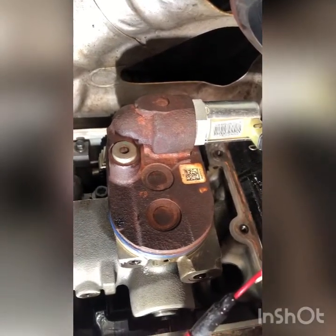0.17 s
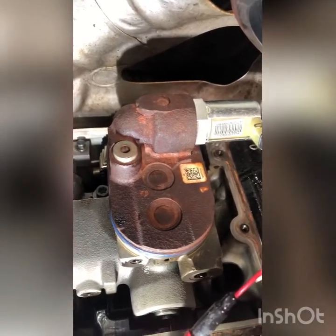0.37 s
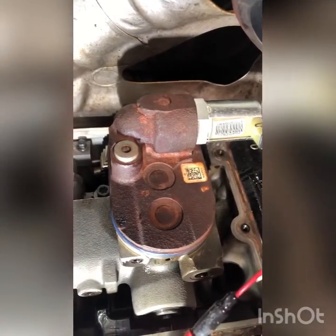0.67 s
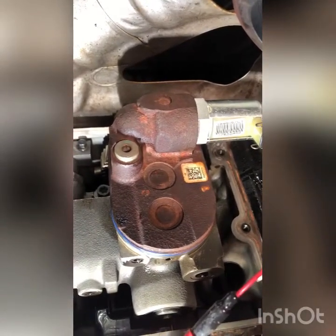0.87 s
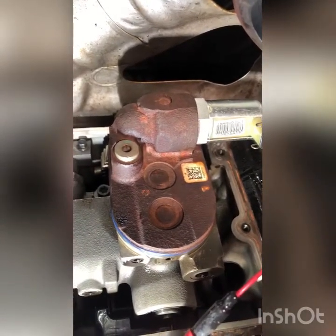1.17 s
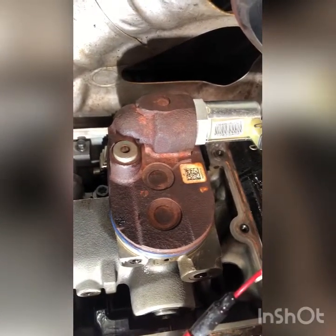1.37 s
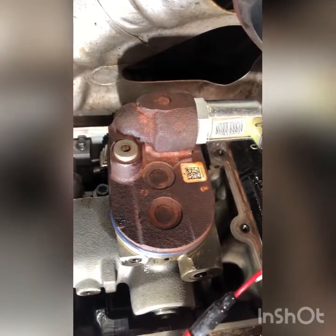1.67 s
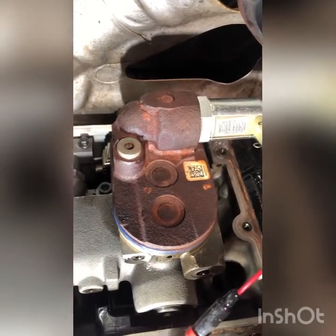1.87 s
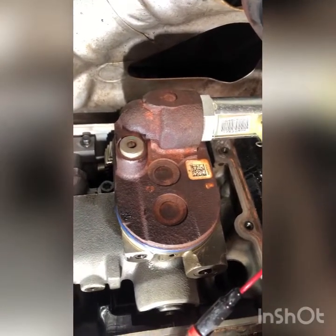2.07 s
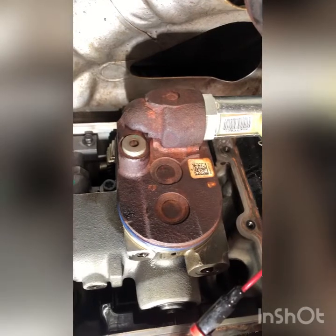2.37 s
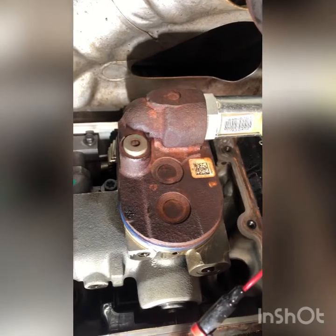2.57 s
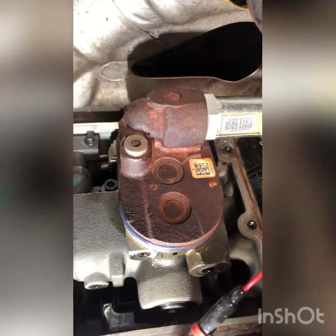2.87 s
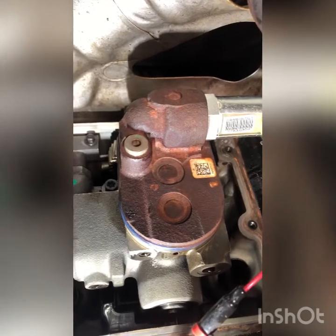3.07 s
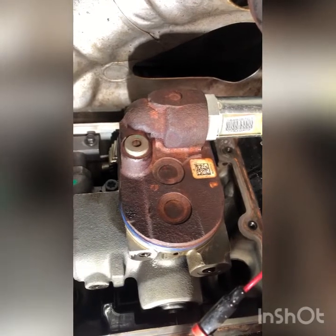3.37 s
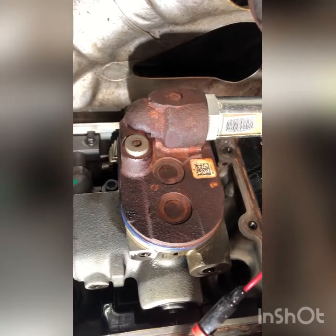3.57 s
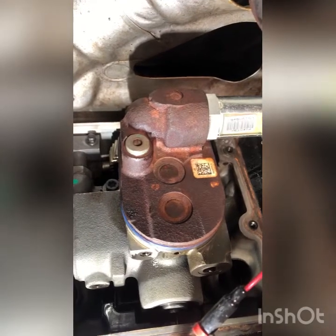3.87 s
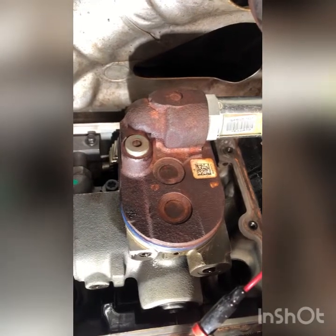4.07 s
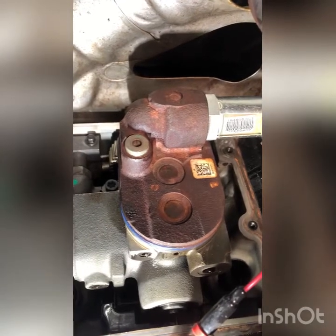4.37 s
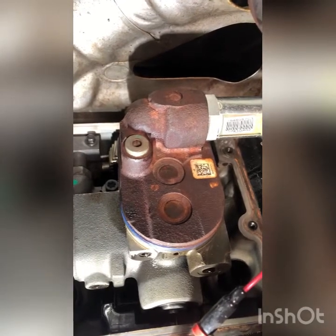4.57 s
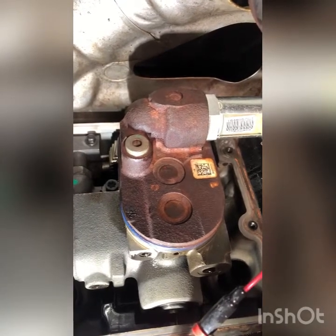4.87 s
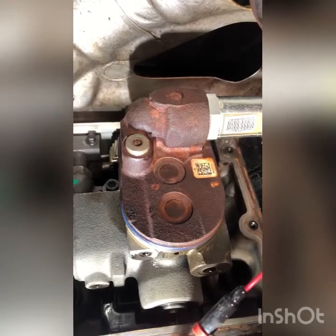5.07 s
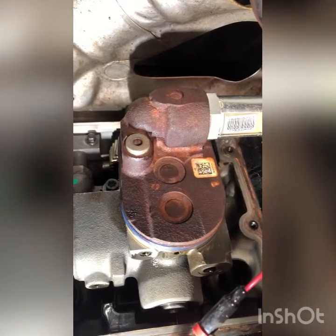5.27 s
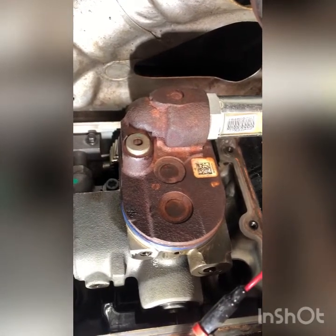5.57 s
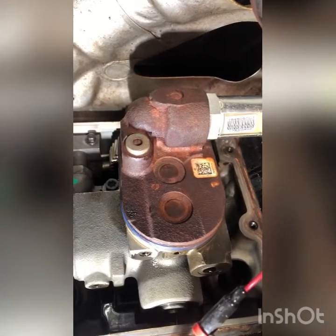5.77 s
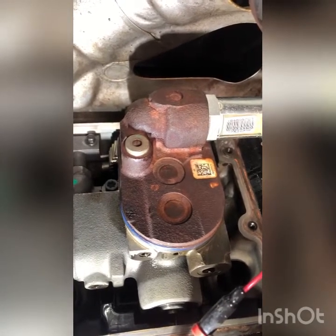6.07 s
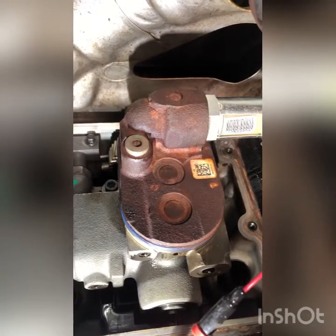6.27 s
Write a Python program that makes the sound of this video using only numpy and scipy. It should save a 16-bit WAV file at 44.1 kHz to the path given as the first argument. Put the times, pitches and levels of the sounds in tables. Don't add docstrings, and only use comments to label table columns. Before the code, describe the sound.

One close microphone, the same in both channels, catches air escaping from an engine valve. Quiet leaking hiss and building rumble come first, with tiny high chirps and a faint distant motor whine. Three strong hissing bursts follow, each starting quickly after a small spit. The solenoid plunger slams the first two shut with a short, ringing metal knock and little rebounds; the third is left blowing.

```python
import sys
import numpy as np
from scipy import signal
from scipy.fft import rfft, irfft
from scipy.io import wavfile

SR = 44100
rng = np.random.default_rng(int(sys.argv[2]) if len(sys.argv) > 2 else 0)


def gain_from_db(level_db):
    decades = np.asarray(level_db, float) / 20
    return 10 ** decades


def output_pcm(signal):
    pcm = np.clip(np.atleast_2d(signal).T, -1, 1) * 32767
    wavfile.write(sys.argv[1], SR, np.round(pcm).astype(np.int16))


N = 282681
TIME = np.arange(N) / SR
HZ = np.fft.rfftfreq(N, 1 / SR) + 1e-3


def rms_one(x):
    return x / np.sqrt(np.mean(x ** 2) + 1e-20)


def at_hz(points):
    hz, level_db = np.transpose(points)
    return gain_from_db(np.interp(np.log(HZ), np.log(hz), level_db))


def cavities(peaks):
    power = 0
    for hz, width, level_db in peaks:
        power = power + gain_from_db(2 * level_db) / (1 + (2 * (HZ - hz) / width) ** 2) ** 2
    return np.sqrt(power)


def noise(gain):
    return rms_one(irfft(rfft(rng.standard_normal(N)) * gain, N))


def drift(rate_hz):
    r = np.exp(-2 * np.pi * rate_hz / SR)
    return rms_one(signal.lfilter([1], [1, -2 * r, r * r], rng.standard_normal(N + SR))[SR:])


def ring(clicks, hz, t60):
    r = gain_from_db(-60 / (t60 * SR))
    w = 2 * np.pi * hz / SR
    return signal.lfilter([0, np.sin(w)], [1, -2 * r * np.cos(w), r * r], clicks + 1e-18)


def glide(s, length, from_hz, to_hz, level_db):
    share = np.array([0, 0.2, 1 - 0.32, 1])
    levels = level_db - 14 * np.array([1, 0, 0, 1])
    return np.transpose([s + length * share, from_hz + (to_hz - from_hz) * share, levels])


def wavering(rows, jitter_hz, flutter_db):
    s, hz, level_db = np.transpose(rows)
    pitch = np.interp(TIME, s, hz) + jitter_hz * drift(31.6)
    level = gain_from_db(np.interp(TIME, s, level_db, -130, -130) + flutter_db * drift(20))
    return pitch, np.sqrt(2) * level * np.sin(2 * np.pi * np.cumsum(pitch) / SR)


# (time [s], level [dB])
SLAMS = [
    (2.3611, -1.5),
    (4.7608, -3.5),
]


def since_slam(fade_s):
    return sum(np.exp(-np.clip(TIME - s, 0, None) / fade_s) * (TIME > s) for s, _ in SLAMS)


# (frequency [Hz], level [dB per Hz])
SHOP_SPECTRUM = [(12, -64), (20, -41), (24, -45), (38, -8.5), (113, -2), (185, -6), (209, -14),
                 (347, -16.5), (555, -23.5), (597, -19), (783, -15.5), (1050, -22.5), (1500, -28),
                 (1950, -29.5), (3300, -120)]
# (frequency [Hz], width [Hz], level [dB])
SHOP_MODES = [(56, 13, 0.5), (70.5, 22, 6.5), (120, 2.2, 10.5), (148, 5, 10.5), (198.6, 15, 5)]
# (time [s], length [s], from [Hz], to [Hz], level [dB])
MOTOR = [
    (0.298, .85, 322.6, 350.6, -71.5),
    (1.998, 1.3, 347, 374, -73),
]


def workshop():
    colour = at_hz(SHOP_SPECTRUM) * np.hypot(1, cavities(SHOP_MODES))
    low = 1 / (1 + (HZ / 215) ** 12)
    shake_db = 7.5 * since_slam(0.12)
    rumble = gain_from_db(drift(2.5) + shake_db) * noise(colour * low)
    haze = gain_from_db(-9 + 0.5 * drift(0.95)) * noise(colour * (1 - low))
    motor = sum(wavering(glide(*row), jitter_hz=1.4, flutter_db=2.5)[1] for row in MOTOR)
    return gain_from_db(-55.5) * (rumble + haze) + motor


# (time [s], frequency [Hz], level [dB], t60 [s])
KNOCKS = [(.655, 780, -54, 0.076), (0.691, 425, -44, 0.052), (1.427, 201, -44, 0.092),
          (2.291, 198, -41, 0.12), (2.77, 129, -45, 0.28), (4.522, 148, -38.5, 0.22),
          (4.53, 290, -43, 0.14), (4.535, 420, -48, 0.13), (4.712, 205, -40.5, 0.15), (5.428, 120, -50, .1),
          (3.655, 1700, -47, .03), (5.891, 425, -46, 0.054), (6.175, 151, -47, 0.077)]


def knocks():
    out = np.zeros(N)
    age = TIME[:SR // 2]
    for s, hz, level_db, t60 in KNOCKS:
        soft_start = 1 - np.exp(-age / 0.0024)
        knock = gain_from_db(level_db - 60 * age / t60) * soft_start * np.sin(2 * np.pi * hz * age)
        start = int(s * SR)
        out[start:start + len(age)] += knock[:N - start]
    return out


# (frequency [Hz], width [Hz], level [dB])
TANK = [(241.5, 37, -17), (350, 120, -28)]
HOSE = [(422, 56, -27), (529, 71, -20.5), (627, 17, -22.5), (734, 96, -14.5), (802.5, 54, -10),
        (912, 41, -17.5), (994, 41, -19.2), (1050, 50, -16.5), (1140, 25, -16.5), (1208, 72, -18),
        (1310, 47, -16.5), (1440, 11, -26), (1502, 59, -16.5), (1638, 200, -17.5), (1715, 190, -15.5)]
VALVE = [(2031, 77, -7), (2152, 118, -4), (2213, 36, -5), (2330, 68, -2), (2509, 130, -1), (2659, 73, 2.5),
         (2630, 18, -2), (2909, 172, -0.5), (3080, 37, -8), (3360, 214, -10.5), (3562, 71, -9),
         (3770, 94, -13), (3870, 50, -4), (4029, 174, 0.5), (4180, 264, -0.3), (4480, 21, -14),
         (4800, 27, -9.5), (4700, 92, -21), (4970, 170, -20.5), (5300, 81, -31), (5252, 50, -19.5),
         (5413, 110, -10.5), (5639, 110, 0.0), (5770, 88, -1), (5750, 36, -18)]
HEAD = [(6173, 180, -4.4), (6608, 145, -18.4), (6790, 156, -14.2), (6931, 134, -16.1), (7104, 134, -10.6),
        (7436, 256, 0.7), (7698, 79, -6.3), (7928, 201, -10.4), (8154, 169, -6.3), (8431, 135, -15.8),
        (8667, 253, -9.6), (8946, 156, -10.3), (9141, 224, -7.7), (9549, 121, -24.9), (9841, 700, -22.7)]
BAY = [(10061, 114, -23.9), (10447, 228, -3.5), (10649, 147, -7.4), (10939, 401, -3.3), (11480, 205, -5.6),
       (11853, 224, -17.9), (12206, 201, -21.8), (12449, 313, -17.5), (12775, 201, -10.8),
       (13142, 195, -17.1), (13452, 85, -13.2), (13852, 441, -8.0), (14456, 263, -14.6), (14718, 247, -7.6),
       (15196, 411, -13.9), (15648, 288, -16.9)]


def passages():
    age = TIME[:SR // 4]
    echoes = rng.standard_normal(len(age)) * gain_from_db(-35 - 60 * age / 0.098) * (age > 0.004)
    ripple = np.abs(1 + rfft(echoes, N))
    hose = cavities(TANK + HOSE) * ripple
    body = (cavities(VALVE + HEAD + BAY) + gain_from_db(-40.5)) * ripple
    return hose, body


# (frequency [Hz], level [dB])
LEAK_TILT = [(500, -11), (1500, -3.5), (2600, -0.5), (5600, 3), (9000, -2), (12000, -1.5), (15500, -3)]


def leak(hose, body):
    level_db = -58 - 8.5 * since_slam(0.23)
    floor = gain_from_db(-29) * (HZ < 9300)
    colour = np.hypot(gain_from_db(4.5) * hose, body + floor) * at_hz(LEAK_TILT)
    return gain_from_db(level_db + 0.5 * drift(4.3)) * noise(colour)


# (time [s], length [s], from [Hz], to [Hz], level [dB])
CHIRPS = [
    (.32, .07, 8980, 8600, -68),
    (.49, .08, 9200, 9130, -62),
    (2.78, .14, 7150, 7120, -74),
    (2.9, .09, 7550, 7200, -64),
    (3.0, .12, 6750, 7150, -75),
    (3.08, .39, 7210, 9480, -68),
    (5.26, .11, 8150, 8800, -73),
]


def whistles(body):
    out = np.zeros(N)
    for row in CHIRPS:
        pitch, tone = wavering(glide(*row), jitter_hz=28, flutter_db=3.5)
        out += tone * gain_from_db(2.5) * np.interp(pitch, HZ, body) ** 0.5
    return out


# (time [s], length [s], level [dB])
PUFFS = [
    (.857, .012, -55),
    (3.656, .011, -58),
    (5.582, .011, -57),
]


def puffs(body):
    gate = sum(gain_from_db(level_db) / (1 + (2 * (TIME - s) / length - 1) ** 8) for s, length, level_db in PUFFS)
    return gate * noise(body ** 0.25 * (HZ > 1200) * np.sqrt(HZ))


def snap():
    treble = signal.butter(2, 11000, "high", fs=SR, output="sos")
    return gain_from_db(-25) * since_slam(0.004) * signal.sosfilt(treble, rng.standard_normal(N))


def clatter(body):
    decay = 0
    for s, slam_db in SLAMS:
        decay = decay + gain_from_db(slam_db - 29 - 60 * np.clip(TIME - s, 0, 1) / 0.078) * (TIME > s)
    return decay * noise(np.sqrt(body) / (1 + (1000 / HZ) ** 4) / (1 + (HZ / 3500) ** 2))


# (frequency [Hz], level [dB], t60 [s])
CASTING = [(68, -43, 0.51), (144.7, -35.5, 0.51), (202, -17.5, 0.021), (234.8, -36.5, 0.31),
           (340, -22, 0.021), (394, -28.5, 0.075), (542, -16.5, 0.024), (573, -36.5, 0.23),
           (656, -29.5, 0.018), (705, -34, 0.14), (723, -9, 0.05), (774.6, -14.5, 0.065),
           (765.6, -19.5, 0.14), (844, -19, 0.036), (916, -27.5, 0.048), (1112, -27.5, 0.05),
           (1070, -18, 0.003), (1437, -32.5, 0.038), (1592, -23.5, 0.022), (2014, -24, 0.062),
           (2100, -23, 0.055), (2220, -27, 0.029), (2460, -35, 0.065), (2480, -5, 0.0055),
           (2470, -26, 0.072), (2630, -36.5, 0.028), (2640, -17, 0.068), (2840, -18.5, 0.038),
           (3920, -36, 0.095), (4166, -23, 0.043)]
# (time after the slam [s], level [dB])
BOUNCES = [
    (.017, -14.5),
    (.033, -21),
    (.049, -43),
    (.061, -25.5),
]


def solenoid():
    clicks = np.zeros(N)
    for s, slam_db in SLAMS:
        clicks[int(s * SR)] = gain_from_db(slam_db)
    seat = signal.butter(3, [60, 4000], "band", fs=SR, output="sos")
    clicks = signal.sosfilt(seat, clicks)
    spread = np.exp(-2j * np.pi * 1.105 * np.log(1 + HZ / 60))
    clicks = irfft(rfft(clicks) * spread, N)
    struck = np.zeros(N)
    for k, (hz, level_db, t60) in enumerate(CASTING):
        struck += (-1) ** k * gain_from_db(level_db) * ring(clicks, hz, t60)
    age = TIME[:SR // 2]
    after = rng.standard_normal(len(age)) * gain_from_db(-44.5 - 60 * age / 0.33) * (age > 0.012)
    for lag, bounce_db in BOUNCES:
        after[int(lag * SR)] += gain_from_db(bounce_db)
    dull = signal.sosfilt(signal.butter(2, 1400, fs=SR, output="sos"), after)
    return struck + signal.fftconvolve(struck, dull)[:N]


# (opening time [s], shutting time [s], jet level [dB])
BURSTS = [
    (0.87, 2.364, -36.5),
    (3.666, 4.764, -36.5),
    (5.594, 6.6, -36.5),
]


def opening(rise_s, lag, swell_db_per_s, surge_db):
    cut_s, trapped_s, surge_s = 0.0029, 0.016, 0.037
    out = 0
    for opens, shuts, level_db in BURSTS:
        age = np.clip(TIME - opens, 0, shuts - opens)
        after = np.clip(TIME - shuts, 0, None)
        surge = surge_db * age / surge_s * np.exp(1 - age / surge_s)
        cut = np.exp(-after / cut_s)
        fall = cut + gain_from_db(-26) * (np.exp(-after / trapped_s) - cut)
        rise = (1 - np.exp(-age / rise_s)) ** lag
        out = out + gain_from_db(level_db + swell_db_per_s * age + surge) * rise * fall
    return out


def jet(hose, body):
    top = 1 / (1 + (9800 / HZ) ** 40)
    eddies = gain_from_db(0.45 * drift(190) + 0.1 * drift(3))
    core_gain = gain_from_db(3.5) * opening(rise_s=0.025, lag=0.96, swell_db_per_s=0.9, surge_db=0.46)
    core = core_gain * noise(body * (1 - top))
    top_gain = opening(rise_s=0.024, lag=2.1, swell_db_per_s=-1, surge_db=0)
    bright = top_gain * gain_from_db(-0.5 + 0.5 * drift(25)) * noise(body * top)
    roar_gain = gain_from_db(-13.5) * opening(rise_s=0.028, lag=2.1, swell_db_per_s=-0.7, surge_db=0)
    return eddies * (core + bright) + roar_gain * noise(hose)


def scene():
    hose, body = passages()
    background = workshop() + knocks()
    air = leak(hose, body) + whistles(body) + puffs(body) + snap() + jet(hose, body)
    metal = clatter(body) + solenoid()
    return np.tile(background + air + metal, (2, 1))


def roll_off(x):
    return signal.sosfilt(signal.butter(12, 16180, fs=SR, output="sos"), x)


def record(dry):
    thin = signal.sosfilt(signal.butter(4, 38, "high", fs=SR, output="sos"), dry)
    mix = irfft(rfft(thin) / (1 + (HZ / 15790) ** 900), N)
    return roll_off(mix)


dry = scene()
out = record(dry)
output_pcm(out)
```